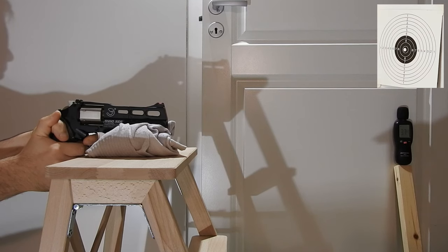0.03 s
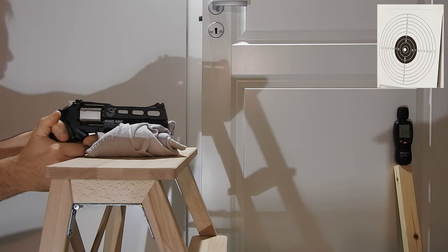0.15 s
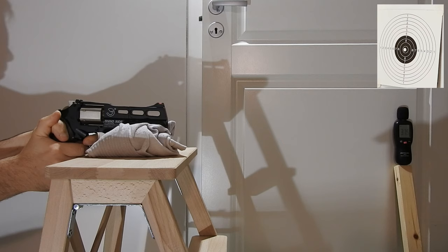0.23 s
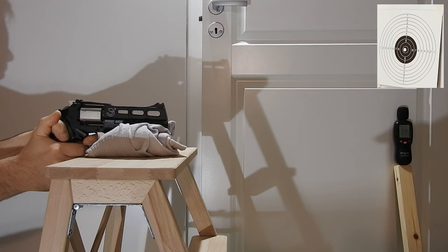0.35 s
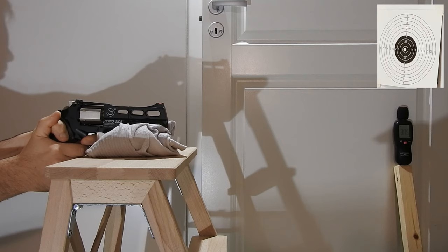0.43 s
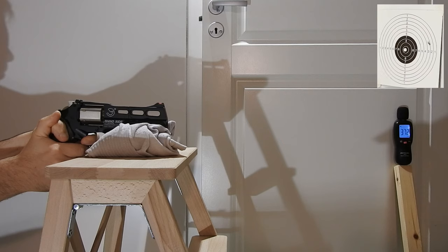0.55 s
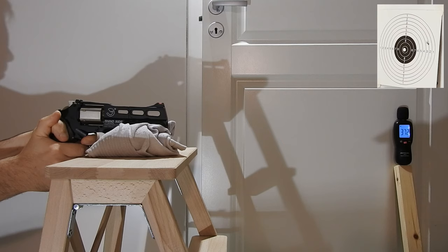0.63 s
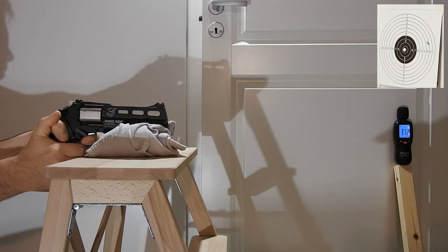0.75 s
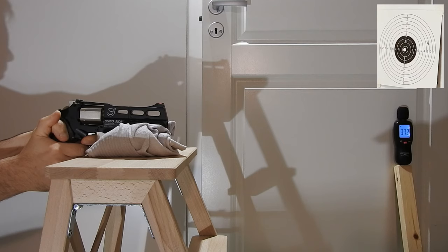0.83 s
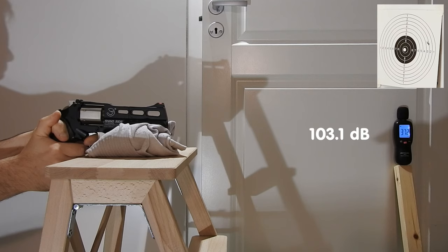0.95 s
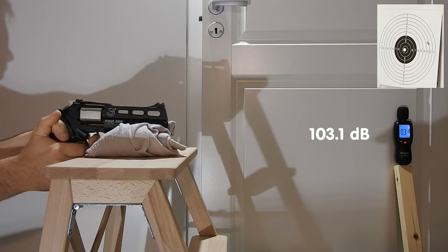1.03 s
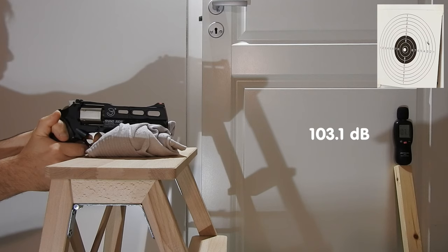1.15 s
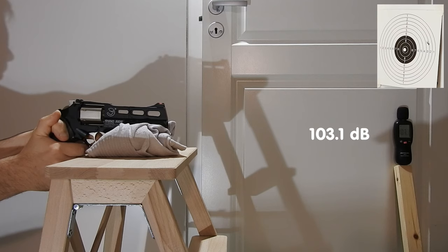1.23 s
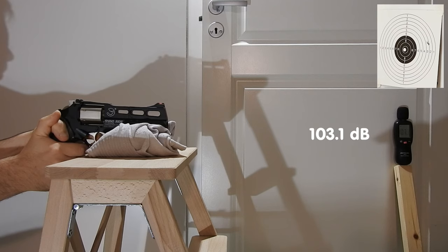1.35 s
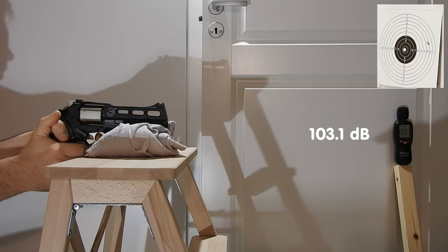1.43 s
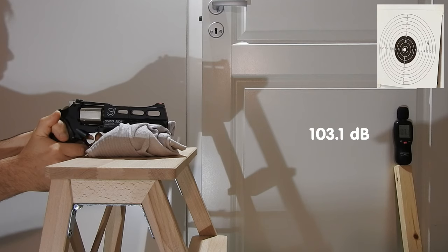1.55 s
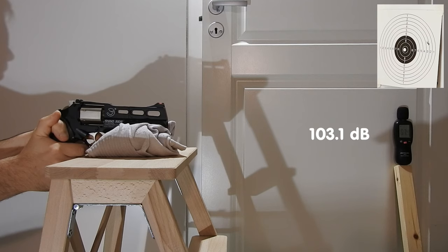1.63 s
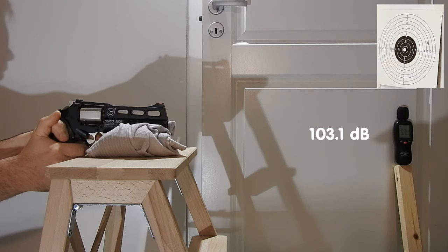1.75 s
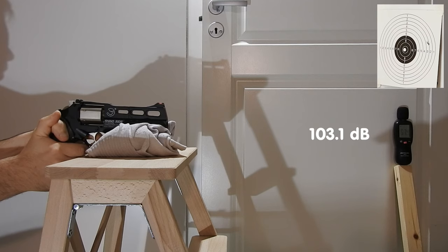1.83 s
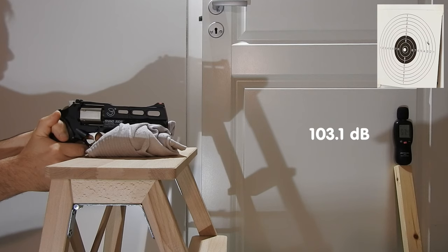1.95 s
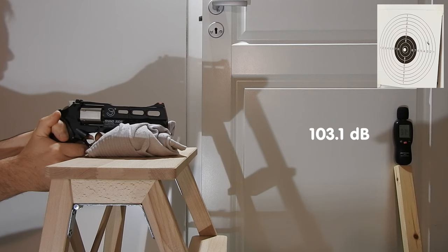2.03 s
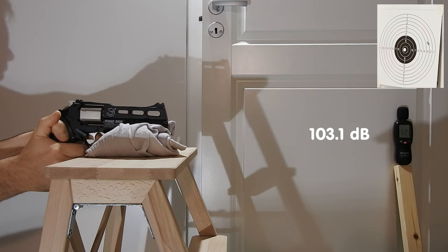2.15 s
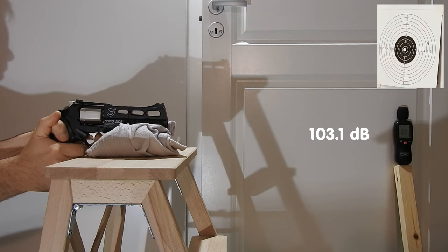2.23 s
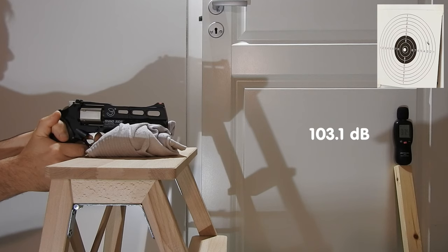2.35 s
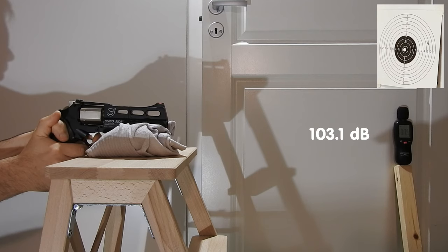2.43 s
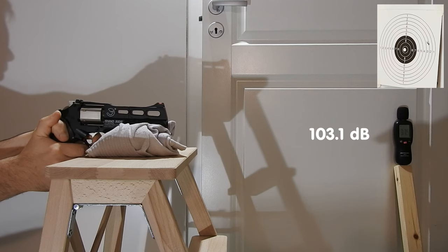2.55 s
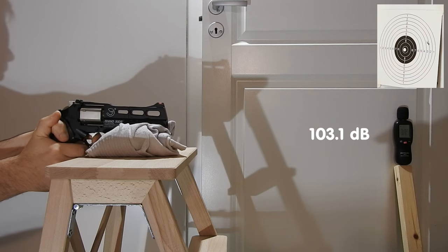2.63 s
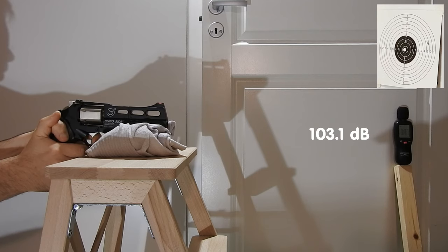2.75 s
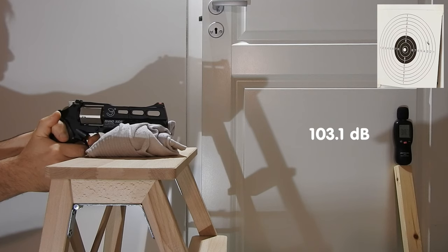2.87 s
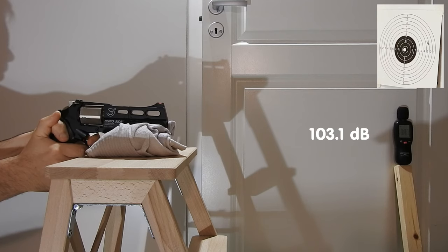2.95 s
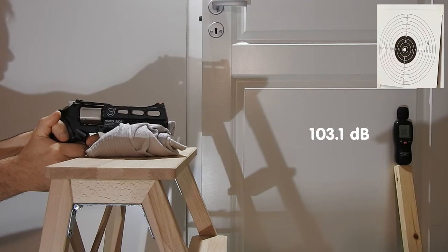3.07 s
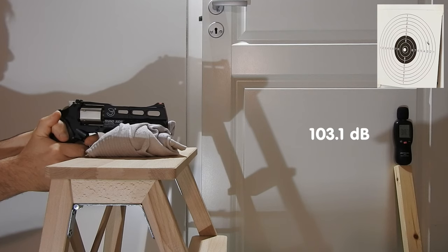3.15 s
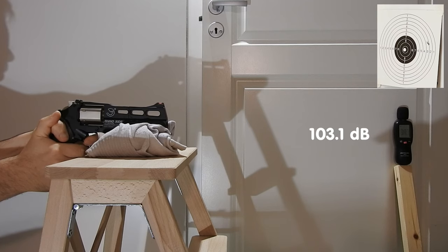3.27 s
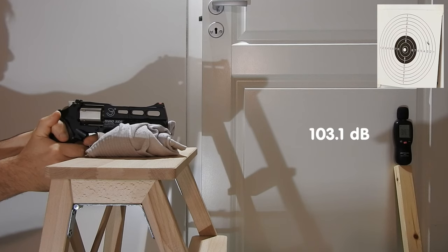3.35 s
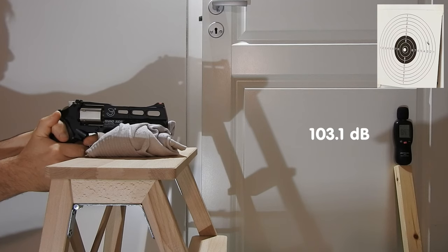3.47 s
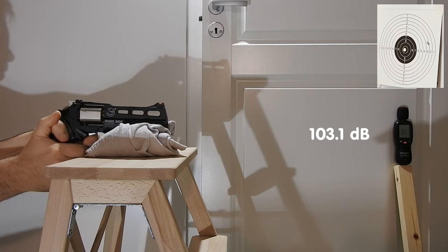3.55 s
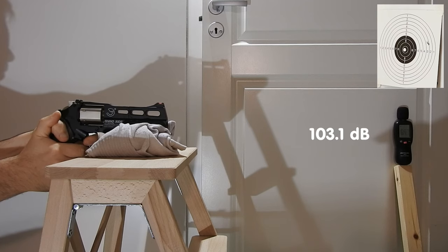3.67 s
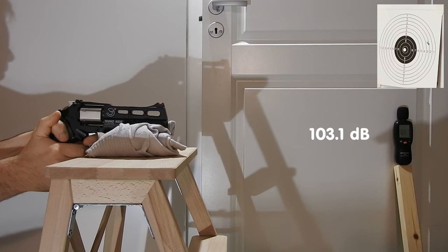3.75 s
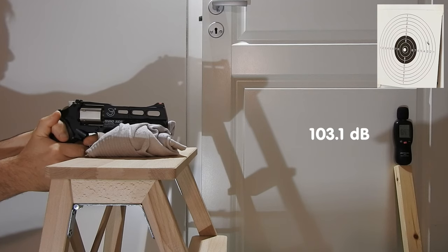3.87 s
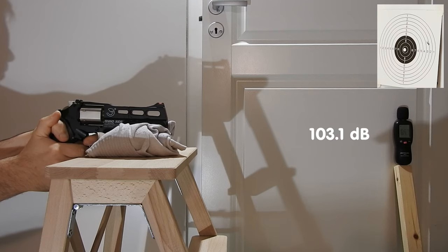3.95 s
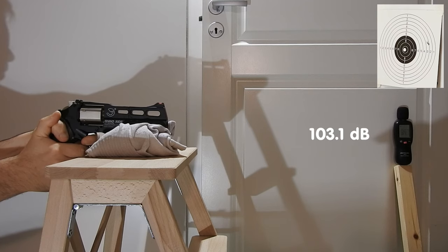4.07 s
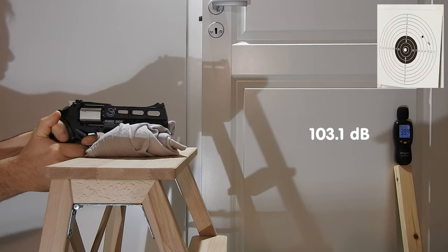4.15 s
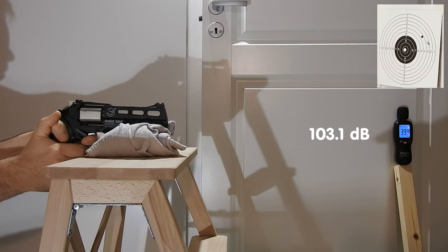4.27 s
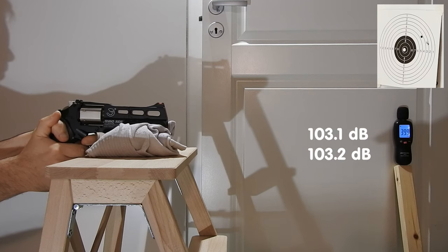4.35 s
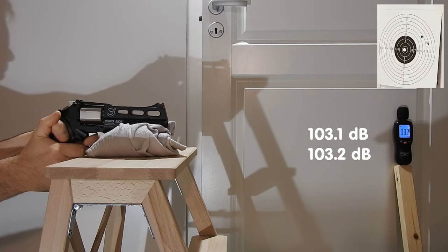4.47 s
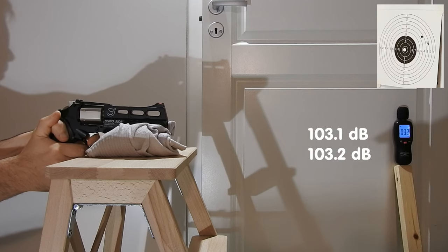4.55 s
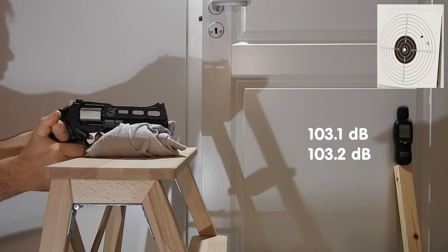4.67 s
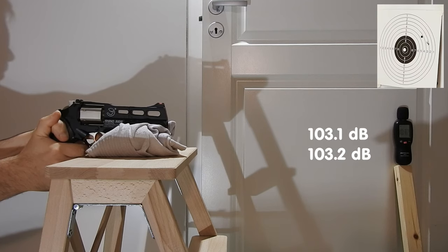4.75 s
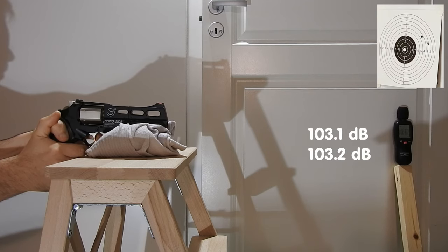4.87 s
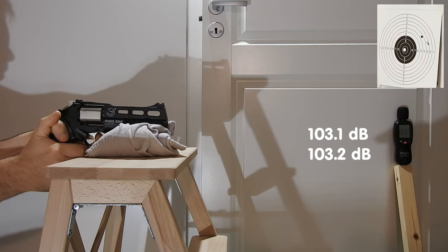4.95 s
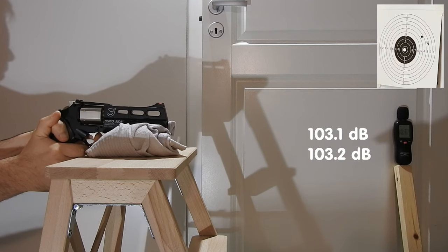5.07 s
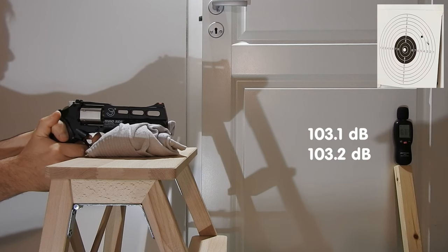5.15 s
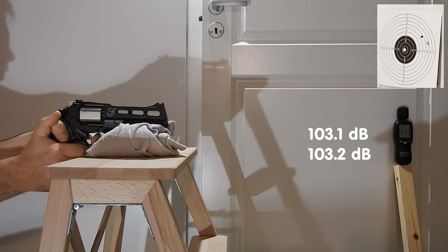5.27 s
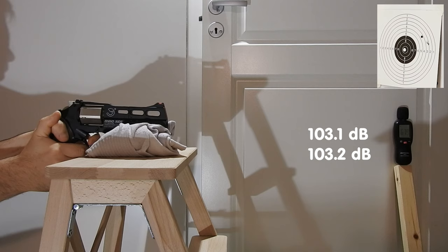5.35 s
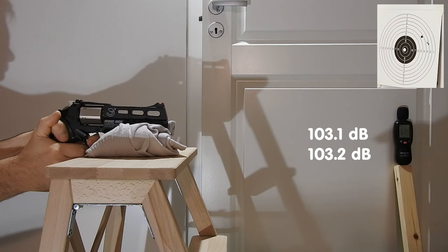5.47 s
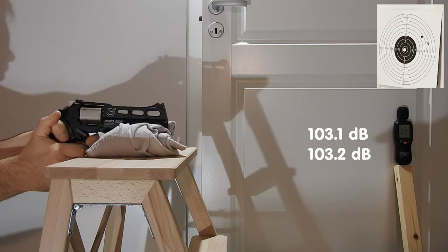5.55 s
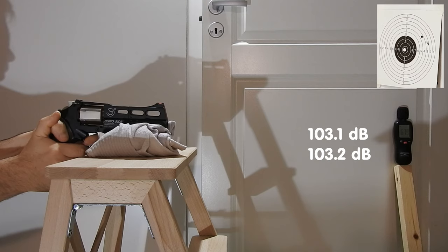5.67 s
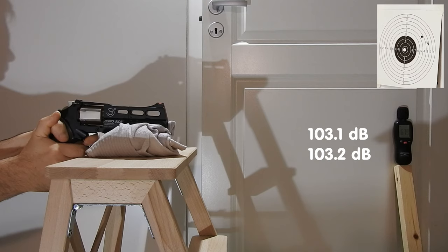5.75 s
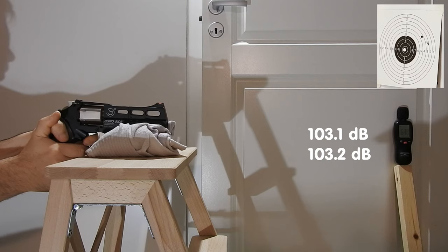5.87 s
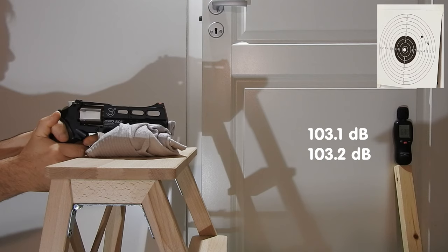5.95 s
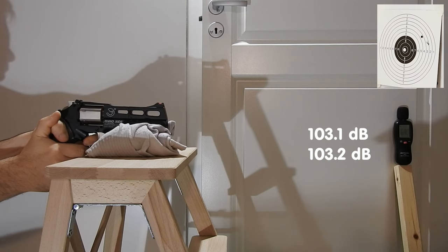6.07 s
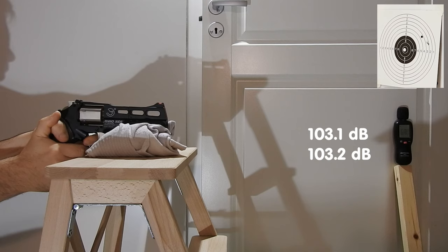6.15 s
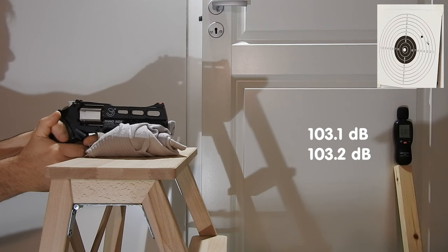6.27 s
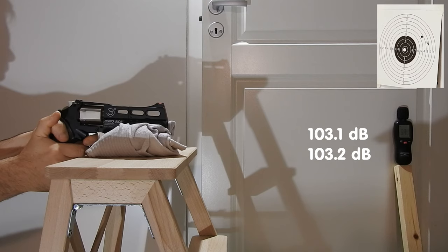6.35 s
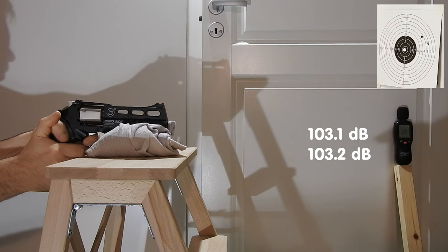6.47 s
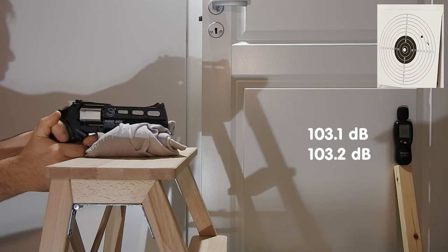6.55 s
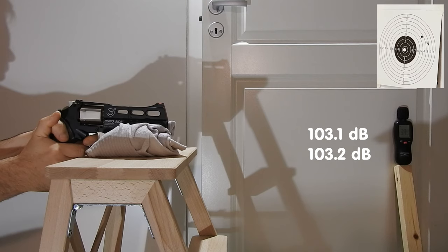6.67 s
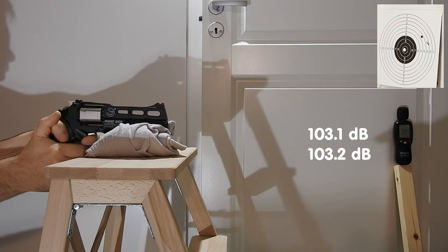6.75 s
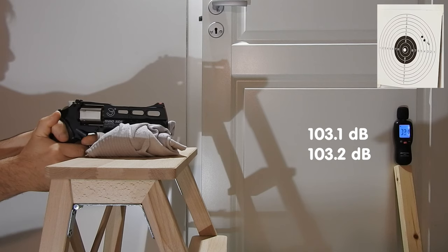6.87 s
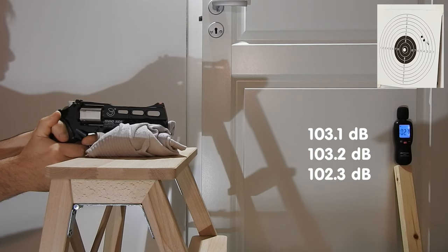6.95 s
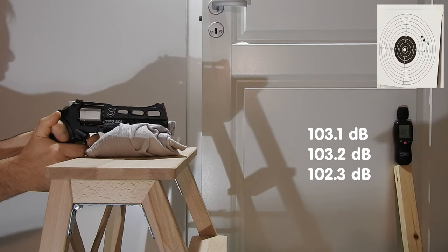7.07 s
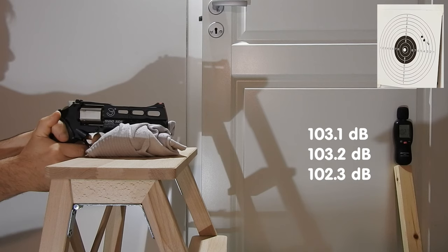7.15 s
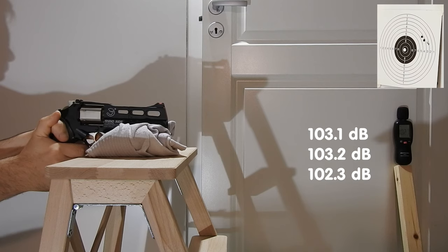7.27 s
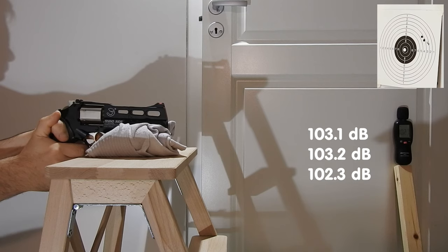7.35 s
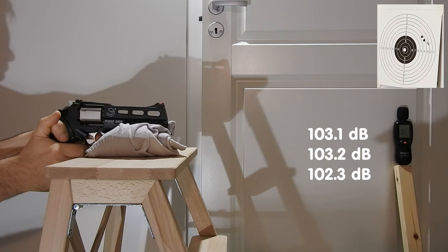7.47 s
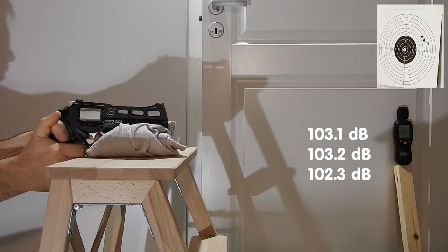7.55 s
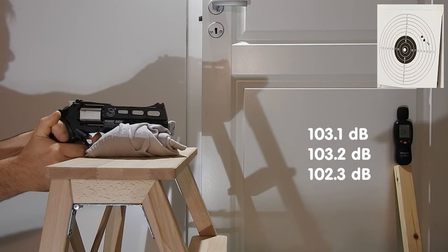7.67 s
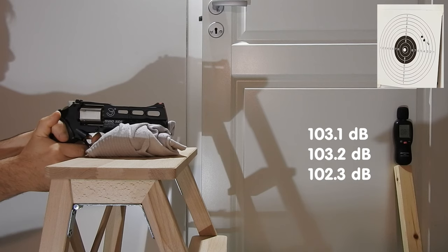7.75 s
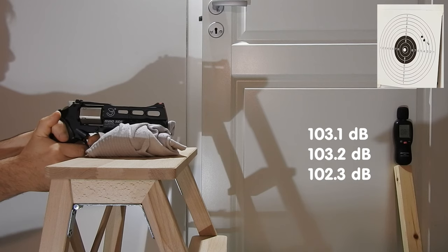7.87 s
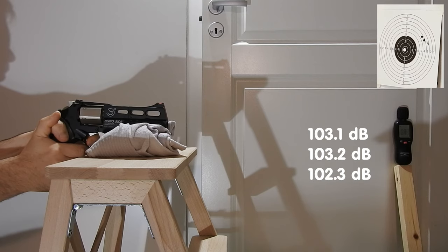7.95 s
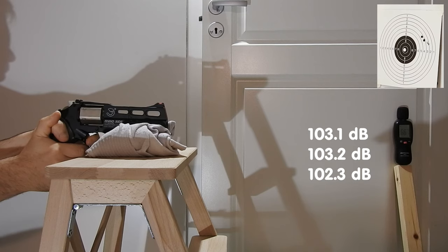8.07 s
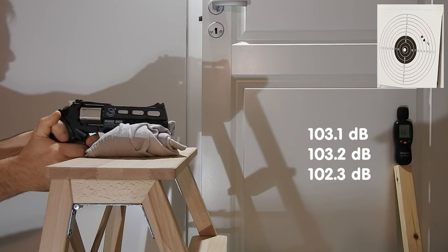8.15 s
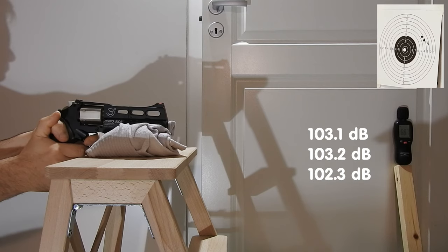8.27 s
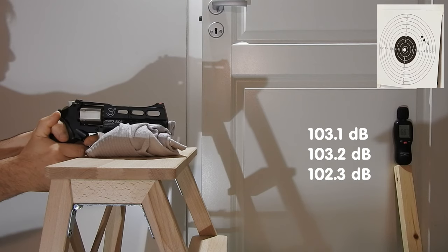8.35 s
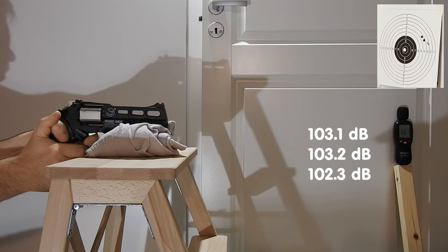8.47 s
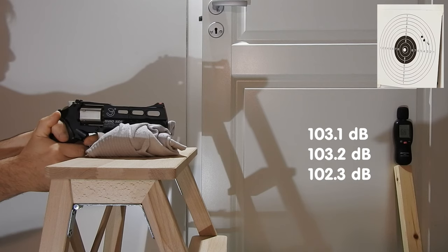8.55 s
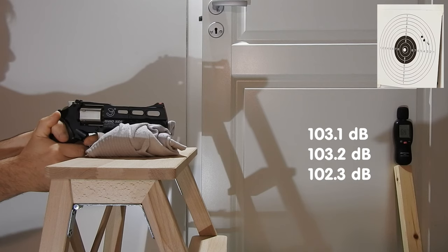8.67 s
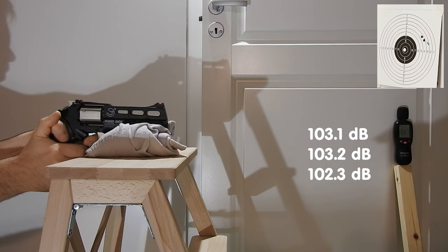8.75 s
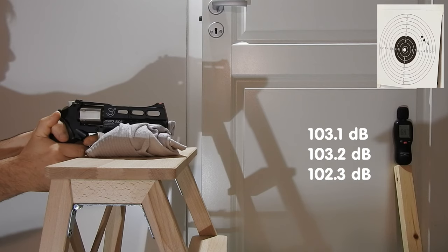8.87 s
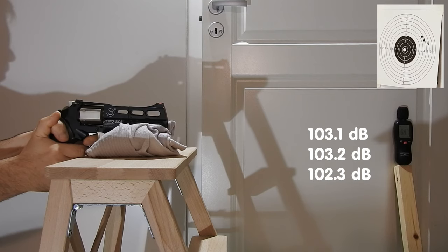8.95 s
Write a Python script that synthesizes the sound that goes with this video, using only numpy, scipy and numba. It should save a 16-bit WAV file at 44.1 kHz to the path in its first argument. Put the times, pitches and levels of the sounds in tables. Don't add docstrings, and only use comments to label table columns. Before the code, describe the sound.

A quiet indoor room with faint low hum and hiss.

```python
import sys
import numpy as np
from scipy import signal
from scipy.fft import rfft, irfft, next_fast_len
from scipy.io import wavfile
from scipy.ndimage import uniform_filter1d
from numba import njit

SR = 44100
rng = np.random.default_rng(int(sys.argv[2]) if len(sys.argv) > 2 else 0)


def natural_amplitude(level_db):
    exponent = np.asarray(level_db, float) / 20
    return 10 ** exponent


def output_pcm(signal):
    pcm = np.clip(np.atleast_2d(signal).T, -1, 1) * 32767
    wavfile.write(sys.argv[1], SR, np.round(pcm).astype(np.int16))


N = 397341

# [f/Hz, level/dB]
LIGHT_KNOCK = [(600, -38.5), (1500, -11), (2400, -8), (3100, -3), (3800, -5), (4500, -7), (7000, -50)]
# [f/Hz, level/dB]
FRAME_KNOCK = [(180, -50.5), (300, -31.5), (1200, -25), (1450, -16.5), (1700, -20.5), (3590, -5),
               (4500, -0.5), (7000, -59)]
# [f/Hz, level/dB]
SOFT_CONTACT = [(3500, -31), (4800, -4.5), (6200, -0.5), (7500, -9), (9000, -23.5), (12000, -29),
                (16000, -44)]


def along(points, hz):
    f, v = np.transpose(points)
    return np.interp(np.log(hz + 1), np.log(f + 1), v)


def filtered(x, response):
    m = next_fast_len(x.shape[-1] + 8192)
    hz = np.fft.rfftfreq(m, 1 / SR)
    return irfft(rfft(x, m) * response(hz), m)[..., :x.shape[-1]]


@njit
def follow(level, rise, fall):
    held, out = 0., np.empty_like(level)
    for i in range(len(level)):
        held += (level[i] - held) * (rise if level[i] > held else fall)
        out[i] = held
    return out


def add(out, s, sound):
    part = out[:, round(s * SR):][:, :sound.shape[1]]
    part += sound[:, :part.shape[1]]


def causal(gain):
    cepstrum = irfft(np.log(gain + 1e-5))
    half = len(cepstrum) // 2
    cepstrum[1:half] *= 2
    return -irfft(np.exp(rfft(cepstrum[:half], len(cepstrum))))


def blow(spectrum):
    out = causal(natural_amplitude(along(spectrum, np.fft.rfftfreq(4096, 1 / SR))))
    return out / np.abs(out).max()


def joined(a, b):
    return causal(np.hypot(np.abs(rfft(a)), np.abs(rfft(b))))


def modes(table, seconds, scatter_db, split):
    t = np.arange(round(seconds * SR)) / SR
    out = 0
    for hz, db, t60 in table * 2:
        decay = natural_amplitude(db + scatter_db * rng.standard_normal() - 60 * t / t60)
        detuned = hz * (1 + split * rng.standard_normal())
        out = out + decay * np.sin(2 * np.pi * detuned * t)
    return out / 2


def slips(seconds, rise_db, count):
    at = (np.arange(count) + rng.uniform(-0.52, 0.44, count)) / max(count - 1, 1)
    at = np.clip(at, 0, 1)
    scatter_db = 2.3 * rng.standard_normal(count) * (count > 1)
    train = np.zeros(round(seconds * SR) + 1)
    train[np.round(at * (len(train) - 1)).astype(int)] = natural_amplitude(rise_db * (at - 1.5) + scatter_db)
    return train


def pair(noise, alike, hz):
    turn = np.arccos(np.clip(along(alike, hz), -1, 1))[:, None] / 2
    mid, side = noise[0] * np.cos(turn), noise[1] * np.sin(turn)
    return np.array([mid + side, mid - side])


def room(pan_db, wet_db, rattle_db, rattle_t60, size):
    # [f/Hz, t60/s]
    decay_times = [(100, 0.56), (500, 0.38), (1500, 0.46), (4000, 0.49), (7000, 0.4), (12000, 0.32)]
    # [t/s, left level/dB, right level/dB]
    near_walls = [(.0032, -16, -8), (.0082, -5, -3), (.0092, -7, -4), (.014, -7.5, -10), (0.018, -6, -9)]
    # [f/Hz, correlation]
    tail_alike = [(60, 0.94), (130, 0.98), (290, 0.98), (640, 0.94), (1410, 0.32), (3100, 0.91),
                  (6820, 0.52), (15000, -0.15)]
    t = np.arange(size) / SR
    hz, frames, z = signal.stft(rng.standard_normal((2, size)), SR, nperseg=256)
    dying = natural_amplitude(-60 * frames / along(decay_times, hz)[:, None])
    tail = signal.istft(pair(z, tail_alike, hz) * dying, SR, nperseg=256)[1][:, :size]
    tail *= 1 - np.exp(-t / 0.0049)
    answer = natural_amplitude(wet_db) * tail / np.sqrt(np.sum(tail ** 2) / 2)
    short = t[:SR // 20]
    direct = (0.00049, pan_db / 2, -pan_db / 2)
    for s, *db in [direct] + near_walls:
        rattle = natural_amplitude(rattle_db - 60 * short / rattle_t60) * rng.standard_normal(len(short))
        rattle[0] = .6 if s else 1
        add(answer, s, natural_amplitude(db)[:, None] * rattle)
    return answer


def heard(sound, *place, size):
    return signal.fftconvolve(sound[None], room(*place, size), axes=1)


def hush():
    # [f/Hz, level/dB]
    tone_spectrum = [(15, -37), (25, -16), (38, -7.5), (84, 1.5), (170, 1), (352, -7.5), (381, 1.5),
                     (473, -6.5), (1060, -8.5), (1250, -10.5), (1390, -13.5), (3580, -19), (6130, -17.5),
                     (8030, -24.5), (15800, -35)]
    # [f/Hz, correlation]
    tone_alike = [(60, 0.36), (180, 0.37), (550, 0.83), (1650, 0.48), (4970, 0.12), (15000, 0.047)]
    tone_db = -52.5 + 1.14
    hz, t, z = signal.stft(rng.standard_normal((2, N)), SR, nperseg=2048)
    patches = uniform_filter1d(rng.standard_normal(z.shape[1:]), size=20, axis=0)
    patches = uniform_filter1d(patches, size=6, axis=1)
    gain = natural_amplitude(along(tone_spectrum, hz)[:, None] + 0.36 * patches / patches.std())
    air = signal.istft(pair(z, tone_alike, hz) * gain, SR, nperseg=2048)[1][:, :N]
    return natural_amplitude(tone_db) * air / air.std()


def clicks(rows, bright, body, body_db, steel=None, ring_db=0, seconds=0, rise_db=0, count=1):
    out = np.zeros((2, N))
    for s, db, *own_db in rows:
        knock = joined(blow(bright), natural_amplitude(body_db + sum(own_db)) * blow(body))
        snap = knock
        if steel:
            snap = knock + natural_amplitude(ring_db) * modes(steel, len(knock) / SR, 2.5, 0.0029)
        snap = signal.fftconvolve(snap, slips(seconds, rise_db, count))
        add(out, s + .0005, natural_amplitude(db + 1.5) * heard(snap, 6.5, 6.06, -11.0, 0.0082, size=SR // 2))
    return out


def stool():
    # [t/s, level/dB]
    creaks = [
        (2.118, -50),
    ]
    # [f/Hz, level/dB]
    wood = [(700, -26), (1200, -4.5), (1500, 0), (1900, -13), (3000, -17), (6000, -43.5)]
    return clicks(creaks, wood, wood, body_db=-0.5)


def loose_parts():
    # [t/s, level/dB, knock level/dB]
    shifts = [
        (0.998, -27.5, -17),
        (1.0405, -26, -11),
        (3.1392, -43.5, -6.5),
        (4.5354, -26.5, -11),
        (4.5845, -24.5, -12),
        (5.2114, -46.5, -2.5),
        (5.31, -49.5, -5),
        (7.7413, -40.5, -3.5),
    ]
    return clicks(shifts, SOFT_CONTACT, LIGHT_KNOCK, body_db=1.5, seconds=.008, rise_db=1.0, count=2)


def trigger():
    # [t/s, level/dB]
    resets = [
        (1.1676, -5.5),
        (4.6878, -5),
        (7.2054, -4.5),
    ]
    # [f/Hz, level/dB]
    reset_snap = [(2060, -44), (3500, -20.5), (4500, -15), (4950, -6), (6210, 1.5), (9410, -17),
                  (11100, -24.5), (15800, -37)]
    # [f/Hz, level/dB]
    trigger_knock = [(290, -65.5), (500, -42), (1250, -19), (1590, -10.5), (2100, -11), (3450, -13.5),
                     (4500, -2), (7000, -66.5)]
    return clicks(resets, reset_snap, trigger_knock, body_db=-14)


def cylinder_stop():
    # [t/s, level/dB]
    drops = [
        (2.8584, -5),
        (5.3757, -4.5),
        (7.9119, -5),
    ]
    # [f/Hz, level/dB]
    drop_snap = [(2060, -41), (3500, -23.5), (6130, 2.5), (7990, -18), (8560, -18), (10400, -9),
                 (12400, -37.5), (15800, -49.5)]
    # [f/Hz, level/dB, t60/s]
    cylinder_ring = [(3840, -9, .035), (5850, -3.5, 0.047), (7950, 1.5, 0.047), (10250, -4.5, 0.033),
                     (15100, -24.5, 0.046)]
    ramp_s, ramp_db = .024, -10
    ramps = [(s - ramp_s - .004, db + ramp_db) for s, db in drops]
    scrape = clicks(ramps, SOFT_CONTACT, LIGHT_KNOCK, body_db=-9, steel=cylinder_ring, ring_db=-28.5,
                    seconds=ramp_s, rise_db=23.5, count=9)
    drop = clicks(drops, drop_snap, FRAME_KNOCK, body_db=-17, steel=cylinder_ring, ring_db=-18)
    return scrape + drop


def sear():
    # [t/s, level/dB]
    catches = [
        (3.1988, -5),
        (5.6459, -4.5),
        (8.328, -2.5),
    ]
    # [f/Hz, level/dB]
    catch_snap = [(2060, -40), (3500, -23.5), (6170, 3), (7640, -1.5), (9530, -14.5), (10500, -17.5),
                  (10800, -26), (15800, -60)]
    # [f/Hz, level/dB, t60/s]
    hammer_ring = [(3700, -5.5, 0.024), (5983, -6.5, .03), (7730, -4.5, 0.025), (10270, -9.5, 0.039),
                   (15000, -27, .04)]
    touch_s, touch_db = 0.011, -18
    touches = [(s - touch_s, db + touch_db) for s, db in catches]
    touch = clicks(touches, catch_snap, LIGHT_KNOCK, body_db=-1.7, steel=hammer_ring, ring_db=-13)
    catch = clicks(catches, catch_snap, FRAME_KNOCK, body_db=-15.5, steel=hammer_ring, ring_db=-20.5)
    return touch + catch


def shots():
    # [t/s, treble peak level/dB]
    fired = [
        (0.4488, 1),
        (4.0626, 2.5),
        (6.771, 0),
    ]
    # [f/Hz, level/dB]
    jet_spectrum = [(2060, -34.5), (3500, -21), (4860, -7), (5760, -1), (6700, 1), (8140, -12.5),
                    (10300, -21), (15800, -46)]
    # [f/Hz, level/dB]
    push_spectrum = [(30, -45.5), (80, -16), (200, -7), (388, -13), (750, -4), (2120, -10.5), (4500, -4.5),
                     (7000, -61.5)]
    # [f/Hz, level/dB, t60/s]
    room_modes = [(82.6, -6, .72), (162.7, -13, .9), (210.5, 4, 0.42), (235, -1.5, 0.19), (316.5, -5, 0.56),
                  (933, -17.5, 0.81), (1350, -23.5, 1), (1480, -18.5, 0.92)]
    push_db, boom_db, muzzle_pan_db = -13, -28.5, 7
    out = np.zeros((2, N))
    u = np.arange(SR // 50) / SR / 0.00038
    thump = -u * (2 - u) * np.exp(-u)
    swell = 1 - np.exp(-np.arange(round(1.5 * SR)) / SR / .03)
    for s, db in fired:
        push = natural_amplitude(push_db) * blow(push_spectrum)
        blast = joined(blow(jet_spectrum), push)
        add(out, s, natural_amplitude(db + 26.5) * heard(blast, muzzle_pan_db, 16.27, -10.5, 0.012, size=SR))
        add(out, s - .0003, natural_amplitude(db + 10.5) * thump[None])
        boom = swell * modes(room_modes, len(swell) / SR, 1, 0.0069)
        add(out, s, natural_amplitude(db + 24.5 + boom_db) * boom[None])
        ahead = np.arange(round(0.0092 * SR))
        grain = rng.standard_normal(len(ahead)) + 0.12 * rng.standard_normal((2, len(ahead)))
        smear = natural_amplitude(-39.5 + 9 * ahead / len(ahead)) * grain
        add(out, s - len(ahead) / SR, natural_amplitude(db + 20.0) * signal.fftconvolve(smear, push[None], axes=1))
    return out


def scene():
    gun = shots() + trigger() + loose_parts() + stool() + cylinder_stop() + sear()
    loudness = np.minimum(1, np.abs(gun).max(0) / natural_amplitude(-17.0))
    busy = follow(loudness, 1 / (.01 * SR), 1 / (.15 * SR))
    return gun + hush() * natural_amplitude(-5 * busy)


def roll_off(x):
    return signal.sosfilt(signal.butter(12, 15920, fs=SR, output="sos"), x)


def record(dry):
    split_hz, lead_s = 3900, .0108

    def low(hz):
        return 1 / (1 + (hz / split_hz) ** 40)

    x = filtered(dry, lambda hz: 1 - low(hz) + low(hz) * np.exp(2j * np.pi * hz * lead_s))
    held = follow(np.abs(x).max(0), 1 / (0.00017 * SR), 1 / (0.037 * SR))
    x = x * np.minimum(1, natural_amplitude(-3.0) / (held + 1e-9))
    x = signal.lfilter(*signal.butter(2, 35, "high", fs=SR), x)
    x = x / (1 + (x * x) ** 3) ** (1 / 6)
    return roll_off(x)


dry = scene()
out = record(dry)
output_pcm(out)
```